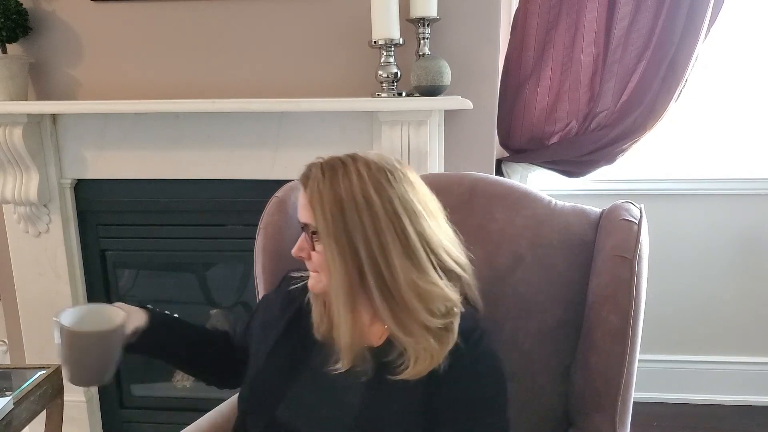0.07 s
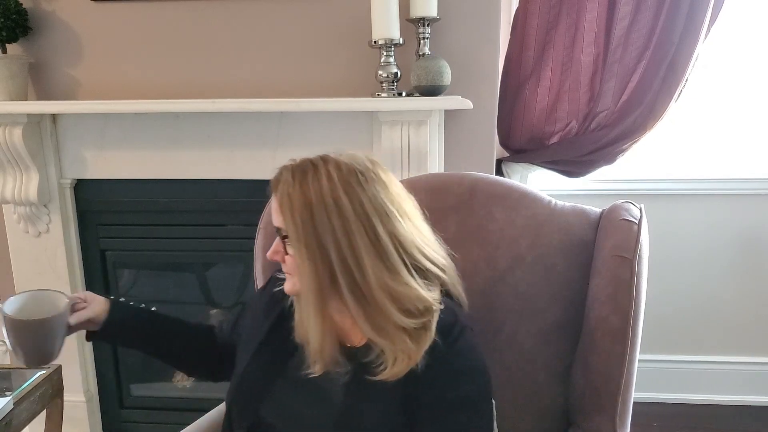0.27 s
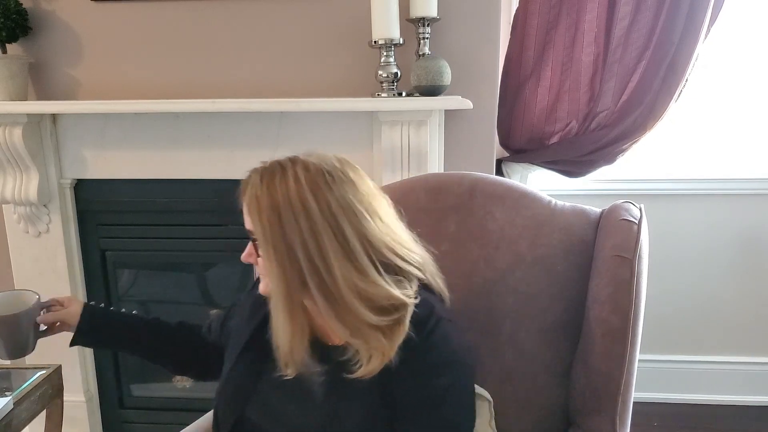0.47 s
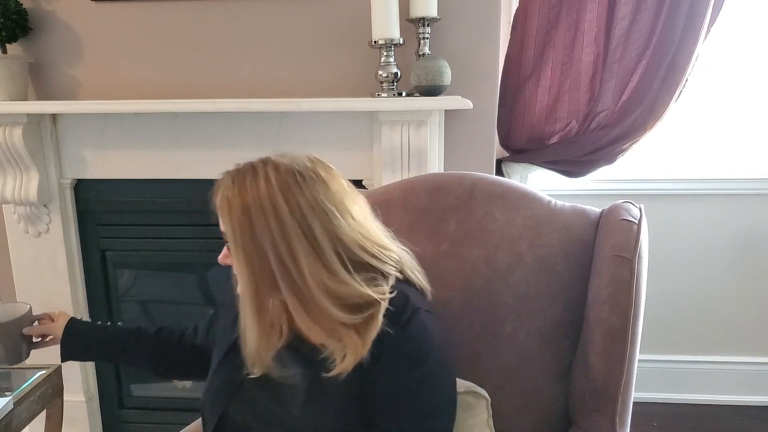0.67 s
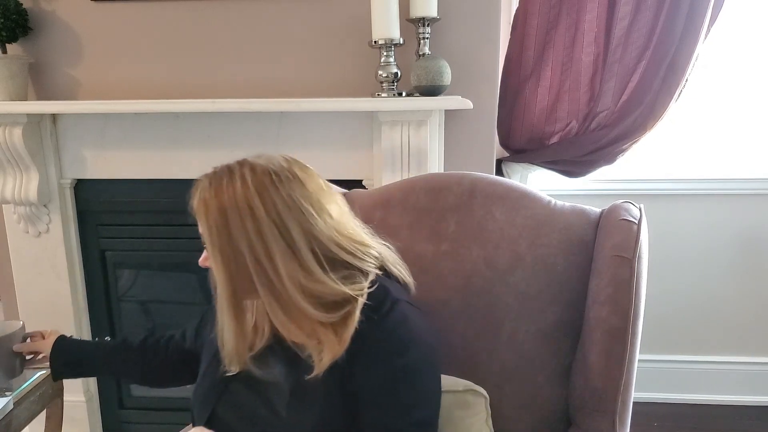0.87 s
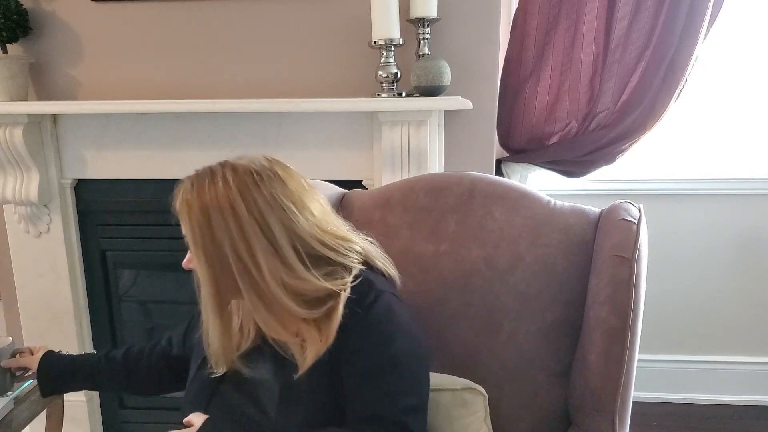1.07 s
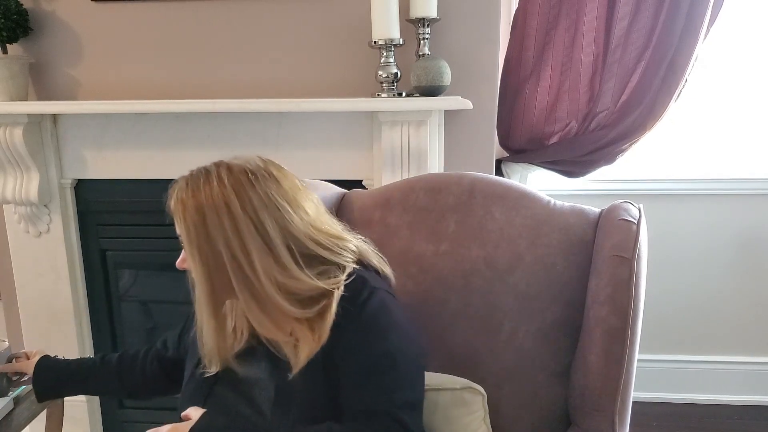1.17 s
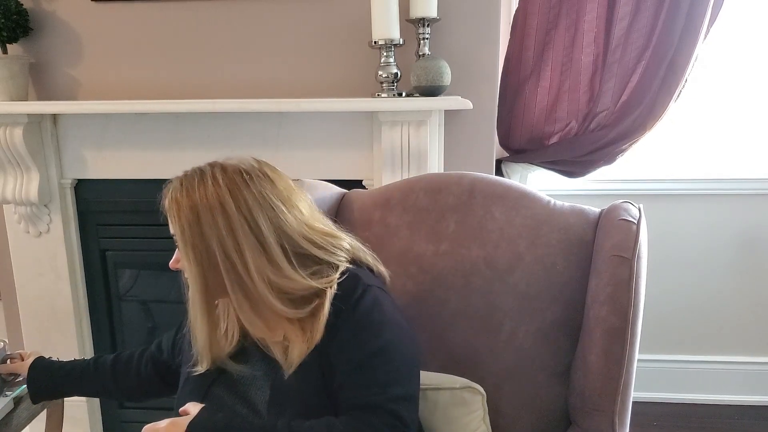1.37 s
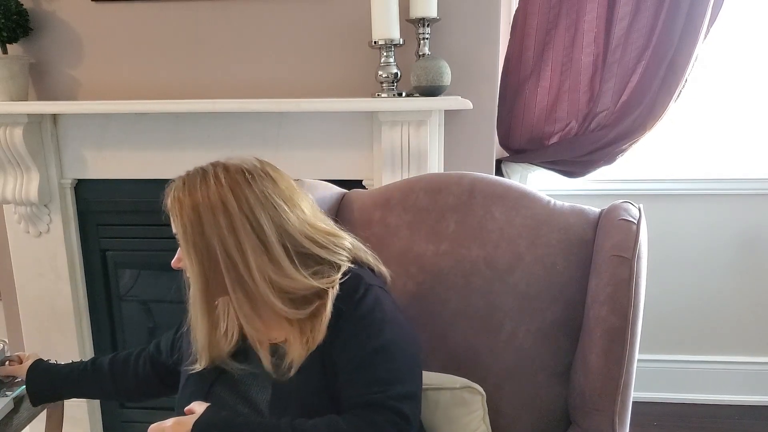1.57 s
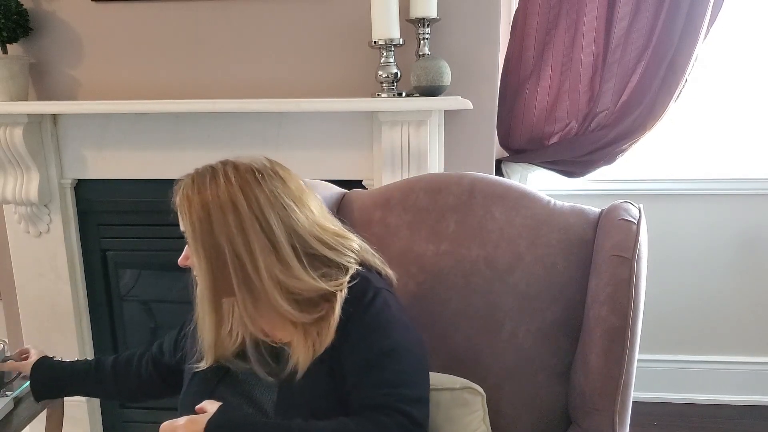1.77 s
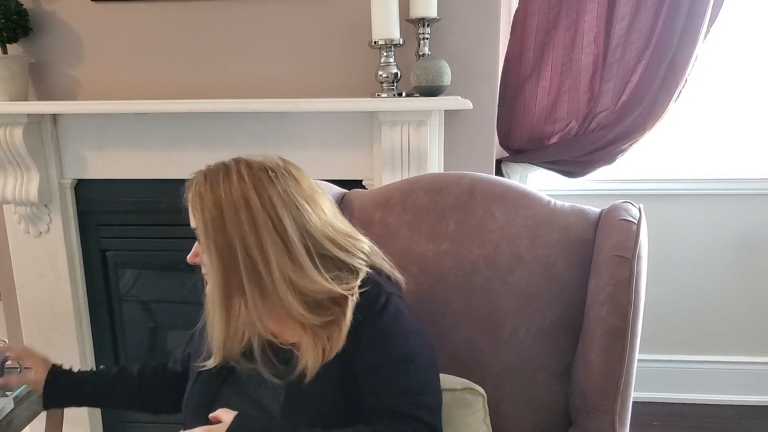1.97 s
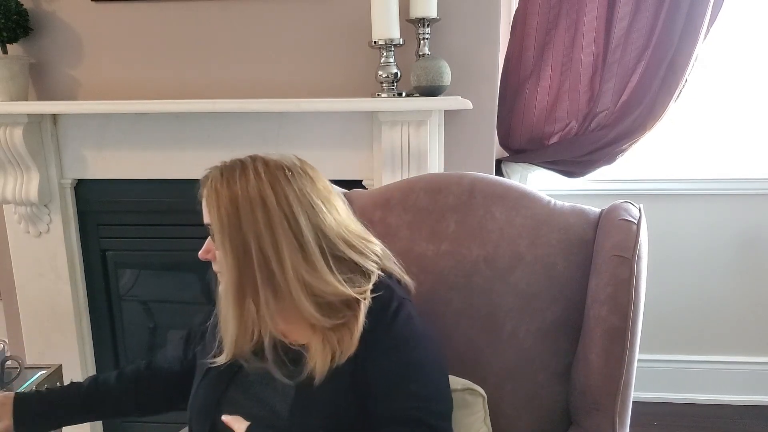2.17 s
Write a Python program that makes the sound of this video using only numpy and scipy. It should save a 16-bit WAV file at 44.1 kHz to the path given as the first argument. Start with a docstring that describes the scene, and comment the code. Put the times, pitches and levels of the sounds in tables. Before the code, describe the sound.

A mug lands on glass with a sharp clinking knock and a low thud, then a duller, quieter knock as it settles; short room ring fades into soft hiss, heard slightly left in a quiet room.

```python
"""Quiet room tone, steady hiss and faint sleeve rustles (shaped noise) lead up to a ceramic mug set on glass.
A hard knock, then a softer one as the mug settles: each a noise crack, sine clinks, wavering
modes of glass and mug, and a dense wash of noise bands that the room holds briefly, then lets fade.
A low thud of swelling sines trails each knock; one thin wavering line rings on from the second."""
import sys
import numpy as np
from scipy import signal
from scipy.fft import rfft, irfft, next_fast_len
from scipy.io import wavfile
from scipy.ndimage import uniform_filter1d

SR = 44100
rng = np.random.default_rng(int(sys.argv[2]) if len(sys.argv) > 2 else 0)


def to_wav(sig):
    """Store sig (one row per channel, or 1-D mono) as 16-bit WAV at the path in sys.argv[1].

    Samples outside -1..1 are clipped; the rate is SR.
    """
    pcm = np.clip(np.atleast_2d(sig), -1, 1) * 32767
    pcm = np.round(pcm).astype(np.int16)
    wavfile.write(sys.argv[1], SR, pcm.T)  # frames by channels


N = 97152
T_S = np.arange(N) / SR
BANDS_HZ = 25 * 2 ** (np.arange(29) / 3)  # third octaves
SIDES = np.array([[1], [-1]])  # left, right

# knocks: t/s, level/dB, wash tilt/(dB/octave above 700 Hz), thud gain/dB, wash length/factor,
# crack gain/dB, clink gain/dB
KNOCK_EVENTS = [(1.2142, 0, 1.5, 3, 0.99, 0, 0), (1.6254, -9.5, 0, 2, 0.86, 1.5, -16)]
# Source levels below are relative to these knock levels and gains.
# modes of the glass top; contact point sets their strength: f/Hz, first knock/dB, second knock/dB
GLASS_MODES = [(136.4, -41.5, -35), (168.1, -32, -30), (209.9, -30.5, -30.5), (363.7, -30.5, -30.5),
               (484.9, -20, -23.5), (517, -24.5, -27), (726.4, -30.5, -40.5), (787, -25, -48),
               (881.4, -24.5, -28.5), (1020, -39, -26.5), (1152, -23, -30.5), (1286.5, -25.5, -27.5),
               (1523, -33, -31.5), (1655, -31.5, -37.5)]
# modes of the mug: f/Hz, first knock/dB, second knock/dB
CERAMIC_MODES = [(1893, -31, -29), (2009, -20.5, -31.5), (2264, -26, -33.5), (2370, -35, -32),
                 (2590, -28, -35), (2673, -25.5, -39.5), (2910, -27, -40), (3200, -30, -38.5),
                 (3406, -30, -38), (3765, -35, -37), (4156, -33.5, -40), (5460, -42.5, -47),
                 (6210, -47, -45.5)]
# dense ring of table and room, before tilt and length factor:
# f/Hz, level/(dB per third octave), t60/s, left-right likeness/(-1 to 1)
WASH_BANDS = [(113, -48, 0.64, 0.88), (182, -38, 0.4, 0.85), (260, -37, 0.61, 0.7), (420, -27, 0.37, 0.1),
              (520, -26.5, 0.47, 0.8), (794, -25, 0.45, 0), (1600, -28.5, 0.49, -.1), (2200, -23.5, 0.4, 0),
              (2900, -26, 0.38, 0.2), (4124, -30.5, 0.36, 0), (6300, -43, 0.37, 0), (9970, -48, 0.21, 0.5),
              (15000, -69.5, 0.33, 0.05)]
# first crack of the contact, before tilt: f/Hz, level/(dB per third octave)
CRACK_BANDS = [(200, -41), (450, -30), (750, -19), (1000, -33.5), (1600, -38.5), (3000, -16), (4500, -35),
               (5500, -37), (8000, -46), (12000, -45.5), (15000, -64.5)]
# clink of the contact itself: f/Hz, level/dB, t60/s
CLINK_LINES = [(720, -15.5, 0.069), (1977, -22, .06), (2856, -12, 0.045), (5436, -23.5, .06),
               (6160, -33, 0.062)]
# low thud of the table: delay/s, f/Hz, level/dB, length/s
THUD_SWELLS = [(.02, 74, -35, .11), (0.078, 44.7, -41, 0.075), (.12, 65.7, -49.5, .19)]
# rustles of the sleeve as the arm reaches out: t/s, length/s, centre f/Hz, level/dB
SLEEVE_RUSTLES = [(-.08, .22, 4860, -72), (.5, 0.027, 3800, -72.5), (0.528, 0.41, 3800, -74)]
# room tone before the drift of its mids: f/Hz, level/(dB per third octave)
ROOM_BANDS = [(25, -86.5), (45, -79.5), (70, -71.5), (110, -76.5), (220, -77), (520, -74), (700, -81),
              (1000, -86.5), (2500, -84), (4000, -84), (6500, -89), (8500, -86.5), (10500, -83.5),
              (15000, -84)]
# drift of the room tone's low middle: t/s, level/dB
ROOM_MIDS_DRIFT = [(0, 7.5), (.15, 8.5), (.4, 4), (.65, 4), (.9, 0.5), (1.2, 1), (2.2, -4.5)]

# Wash: hold by reflections at 1 and 12 kHz, before the length factor; rise = fixed part + cycles
HOLD_1K_S, HOLD_12K_S = 0.1, 0.032
RISE_S, RISE_CYCLES = 0.015, 1.9
RIPPLE_DB, RIPPLE_WIDTH_HZ, RIPPLE_WIDTH_SHARE = 3.5, 30, 0.0092  # uneven in pitch; share is Hz per Hz
CONTACT_RISE_S, CRACK_T60_S = 0.0013, 0.08  # rise shared by crack and clink

# Modes: t60 as a share of the wash table's; sides reach a full 90 apart in phase from MODE_SPREAD_HZ up
MODE_HOLD_S, MODE_T60_SHARE, MODE_SPREAD_HZ = 0.071, 0.94, 850
SCATTER_DEPTH, SCATTER_HZ, SCATTER_HZ_PER_HZ = 0.75, 21.7, 0.008  # waver by reflections

AFTER_RING_HZ, AFTER_RING_DB, AFTER_RING_T60_S = 764, -51, 1.1
AFTER_RING_WAVER_HZ, AFTER_RING_WAVER_DEPTH = 9.6, 0.5
THUD_PHASE_RAD = 0.2  # each side against the middle
LEFT_OVER_RIGHT_DB = 1.07  # knocks only

RUSTLE_WIDTH_SHARE = 0.81  # of the centre frequency
HISS_HZ, HISS_WIDTH_HZ, HISS_DB = 8520, 840, -83
ROOM_MIDS_HZ, ROOM_MIDS_WIDTH_OCT = 450, 1.8
FLICKER_DB, FLICKER_HZ = 0.5, 32
BASS_LIKENESS = 0.85  # room tone, left to right, toward low f
TOP_HZ = 15850


def amp(db):
    """Decibels to gain."""
    return 10 ** (np.asarray(db) / 20)


def at(table, hz, axis=1):
    """A table column interpolated on log frequency."""
    rows = np.array(table, float)
    return np.interp(np.log(hz), np.log(rows[:, 0]), rows[:, axis])


def envelope(age_s, rise_s, hold_s, t60_s):
    """Exponential rise, then a hold that bends smoothly into exponential decay."""
    fading_s = (age_s ** 3 + abs(hold_s) ** 3) ** (1 / 3) - abs(hold_s)
    return (1 - np.exp(-age_s / rise_s)) * np.exp(-np.log(1000) * fading_s / t60_s)


def shaped_noise(shape, size):
    """Two independent noises filtered by a spectral shape."""
    return irfft(rfft(rng.standard_normal((2, size))) * shape, size)


def band(hz, likeness, count=N, ripple_db=0):
    """Stereo third-octave noise, rms 1; ripple adds chance peaks and gaps in pitch."""
    size = next_fast_len(N)
    freqs_hz = np.fft.rfftfreq(size, 1 / SR)
    octaves = np.log2(np.maximum(freqs_hz, 1) / hz)
    shape = np.cos(np.pi / 2 * np.clip(3 * octaves, -1, 1))
    ripple_width_hz = RIPPLE_WIDTH_HZ + RIPPLE_WIDTH_SHARE * hz
    peaks = np.interp((freqs_hz - hz) / ripple_width_hz, np.arange(-64, 64), rng.standard_normal(128))
    noise = shaped_noise(shape * amp(ripple_db * peaks), size)[:, :count]
    mid, side = noise / noise.std(axis=1, keepdims=True)
    c = np.clip(likeness, -1, 1)
    return np.sqrt((1 + c) / 2) * mid + np.sqrt((1 - c) / 2) * SIDES * side


def bell_noise(hz, width_hz):
    """Independent left and right noise in a bell-shaped band, rms 1."""
    size = next_fast_len(N)
    offset = (np.fft.rfftfreq(size, 1 / SR) - hz) / width_hz
    noise = shaped_noise(np.exp(-2 * offset ** 2), size)[:, :N]
    return noise / noise.std()


def waver(age_s, rate_hz):
    """Smooth complex chance: size and phase wander, left and right apart."""
    points = rng.standard_normal((4, 512))
    fine = signal.resample_poly(points, 8, 1, axis=1)
    position = age_s * rate_hz * 8
    v = np.array([np.interp(position, np.arange(fine.shape[1]), row) for row in fine])
    return (v[:2] + 1j * v[2:]) / np.sqrt(2)


def walk(rate_hz):
    """Smoothed random steps, standard deviation 1."""
    k = int(SR / rate_hz)
    steps = np.repeat(rng.standard_normal(N // k + 1), k)
    v = uniform_filter1d(steps, k)[:N]
    return v / v.std()


def wash(age_s, tilt_db, length, crack_db):
    """Contact crack and dense ring: noise bands, each with its own decay."""
    out = 0
    for hz in BANDS_HZ[BANDS_HZ > 90]:
        hold_s = at([(1000, HOLD_1K_S), (12000, HOLD_12K_S)], hz) * length
        t60_s = at(WASH_BANDS, hz, axis=2) * length
        ring = amp(at(WASH_BANDS, hz)) * envelope(age_s, RISE_S + RISE_CYCLES / hz, hold_s, t60_s)
        crack = amp(at(CRACK_BANDS, hz) + crack_db) * envelope(age_s, CONTACT_RISE_S, 0, CRACK_T60_S)
        tilt = amp(tilt_db * np.log2(max(hz / 700, 1)))
        noise = band(hz, at(WASH_BANDS, hz, axis=3), len(age_s), RIPPLE_DB)
        out = out + noise * np.hypot(ring, crack) * tilt
    return out


def modes(age_s, knock):
    """Decaying sines of glass and mug, wavering as room reflections add up."""
    out = 0
    for hz, *db in GLASS_MODES + CERAMIC_MODES:
        apart = min(hz / MODE_SPREAD_HZ, 1) ** 2
        start_rad = 2 * np.pi * rng.random()
        side_rad = np.pi / 4 * apart * rng.choice([-1, 1]) * SIDES
        steady = np.exp(1j * (start_rad + side_rad))
        scatter = waver(age_s, SCATTER_HZ + SCATTER_HZ_PER_HZ * hz)
        scatter = apart * scatter + (1 - apart) * scatter[0]  # low modes waver alike
        t60_s = MODE_T60_SHARE * at(WASH_BANDS, hz, axis=2)
        shape = envelope(age_s, RISE_CYCLES / hz, MODE_HOLD_S, t60_s)
        ring = shape * (steady + SCATTER_DEPTH * scatter)
        ring = ring * np.sqrt(np.mean(shape ** 2) / np.mean(abs(ring) ** 2))  # energy unchanged by waver
        out = out + amp(db[knock]) * (ring * np.exp(2j * np.pi * hz * age_s)).imag
    return out


def clink(age_s):
    """Short, bright decaying sines as ceramic meets glass."""
    out = 0
    for hz, db, t60_s in CLINK_LINES:
        line = np.sin(2 * np.pi * (hz * age_s + rng.random((2, 1))))
        out = out + amp(db) * envelope(age_s, CONTACT_RISE_S, 0, t60_s) * line
    return out


def thud(age_s):
    """Delayed half-sine swells of bass as the table's frame takes the weight."""
    out = 0
    for delay_s, hz, db, length_s in THUD_SWELLS:
        swell = np.sin(np.pi * np.clip((age_s - delay_s) / length_s, 0, 1))
        tone = np.sin(2 * np.pi * (hz * age_s + rng.random()) + THUD_PHASE_RAD * SIDES)
        out = out + amp(db) * swell * tone
    return out


def after_ring():
    """The glass sings faintly with the mug at rest: one decaying, wavering line."""
    age_s = np.maximum(T_S - KNOCK_EVENTS[-1][0], 0)
    wavering = 1 + AFTER_RING_WAVER_DEPTH * waver(age_s, AFTER_RING_WAVER_HZ)
    line = wavering * np.exp(2j * np.pi * AFTER_RING_HZ * age_s)
    return amp(AFTER_RING_DB) * envelope(age_s, RISE_S, 0, AFTER_RING_T60_S) * line.imag


def sleeve():
    """Cloth friction: half-sine swells of bell-band noise."""
    out = 0
    for start_s, length_s, hz, db in SLEEVE_RUSTLES:
        swell = np.sin(np.pi * np.clip((T_S - start_s) / length_s, 0, 1))
        out = out + amp(db) * swell * bell_noise(hz, hz * RUSTLE_WIDTH_SHARE)
    return out


def room_tone():
    """Noise bands, alike on both sides in the bass and wide above; the mids drift and flicker."""
    out = 0
    mids_db = np.interp(T_S, *np.array(ROOM_MIDS_DRIFT).T)
    for hz in BANDS_HZ:
        share = np.exp(-(np.log2(hz / ROOM_MIDS_HZ) / ROOM_MIDS_WIDTH_OCT) ** 2)
        db = at(ROOM_BANDS, hz) + share * (mids_db + FLICKER_DB * walk(FLICKER_HZ))
        out = out + amp(db) * band(hz, BASS_LIKENESS / (1 + (hz / 700) ** 2))
    return out


def hiss():
    """Steady narrow band of wide stereo noise."""
    return amp(HISS_DB) * bell_noise(HISS_HZ, HISS_WIDTH_HZ)


def scene():
    """Two knocks, a little to the left, over the background."""
    out = room_tone() + hiss() + sleeve() + after_ring()
    balance = amp(LEFT_OVER_RIGHT_DB / 2 * SIDES)
    for knock, (start_s, db, tilt_db, thud_db, length, crack_db, clink_db) in enumerate(KNOCK_EVENTS):
        first = int(start_s * SR)
        age_s = T_S[:N - first]
        sound = wash(age_s, tilt_db, length, crack_db) + modes(age_s, knock)
        sound = sound + amp(thud_db) * thud(age_s) + amp(clink_db) * clink(age_s)
        out[:, first:] += amp(db) * sound * balance
    return out


def record(dry):
    """The recorder cuts the top: steep elliptic low-pass."""
    return signal.sosfilt(signal.ellip(10, .2, 80, TOP_HZ, fs=SR, output="sos"), dry)


dry = scene()
out = record(dry)
to_wav(out)
```